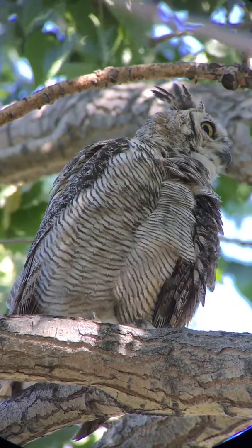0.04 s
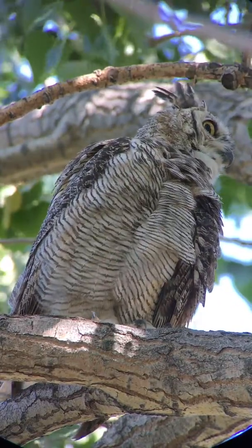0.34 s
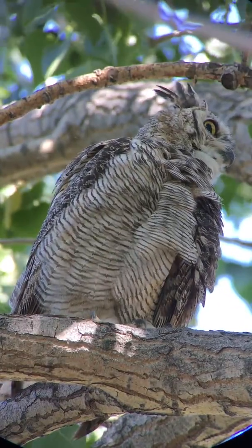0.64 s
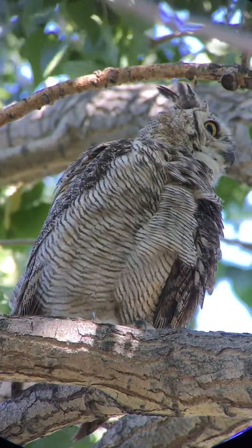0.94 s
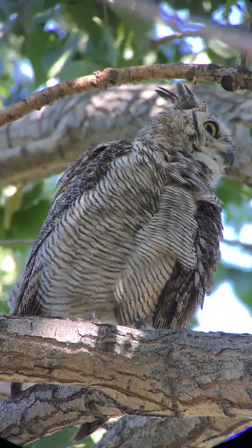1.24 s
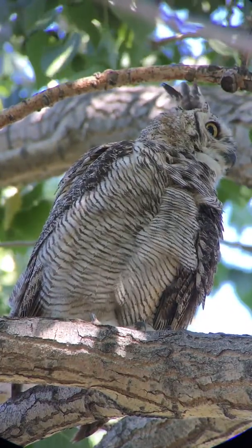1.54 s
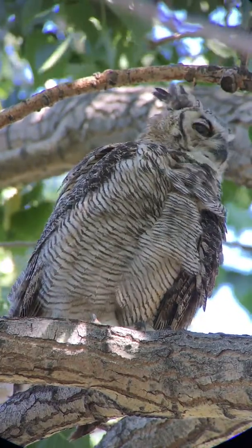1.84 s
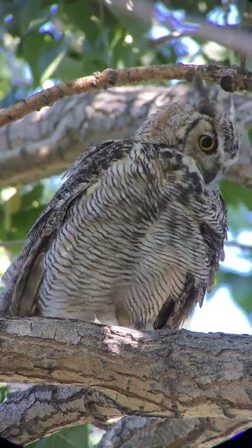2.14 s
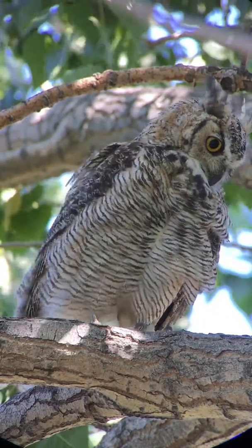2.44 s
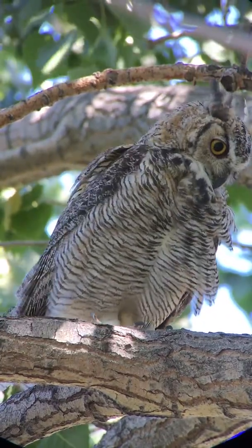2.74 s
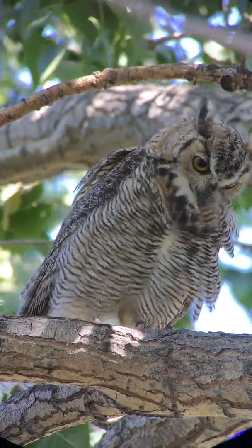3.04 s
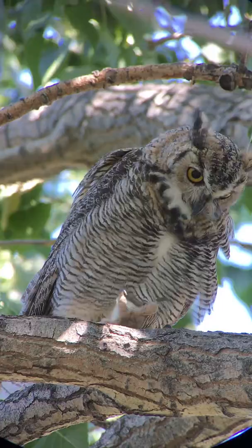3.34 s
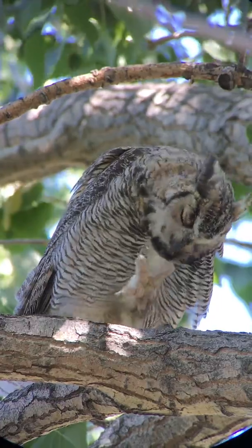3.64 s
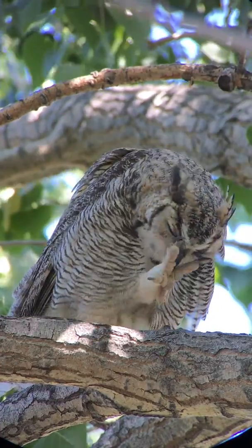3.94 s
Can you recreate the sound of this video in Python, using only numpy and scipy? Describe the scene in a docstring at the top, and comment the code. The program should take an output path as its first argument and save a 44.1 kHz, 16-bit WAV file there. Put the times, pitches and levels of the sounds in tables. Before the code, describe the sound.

Two thin whistled owl calls break into rasps above a faint distant town rumble.

```python
"""Over a town's wash and a distant engine's drone, a bird in leafy trees is already whistling; the thin
note breaks at once into a pitch trill so fast that it rasps, and the trees scatter it. Tiny dry ticks
and faint far chirps come from the branches, and from 1.2 s soft low bumps reach the microphone.
After a soft rustle the bird calls again at 2.6 s: the whistle slides up, holds and breaks into the rasp.
More bumps and a last rustle close the scene."""
import sys
import numpy as np
from scipy import signal
from scipy.fft import rfft, irfft
from scipy.io import wavfile
from scipy.ndimage import uniform_filter1d

SR = 44100
rng = np.random.default_rng(int(sys.argv[2]) if len(sys.argv) > 2 else 0)


def generate_wav(signal):
    """Clip the signal to [-1, 1] and save it as 16-bit WAV at the path in sys.argv[1]."""
    frames = np.transpose(np.atleast_2d(signal))
    scaled = np.clip(frames, -1, 1) * 32767
    pcm = np.round(scaled).astype(np.int16)
    wavfile.write(sys.argv[1], SR, pcm)


N = 176400

# tone colour of the wash (frequency [Hz], relative spectral level [dB])
WASH_SPECTRUM = [(15, -47), (25, -5), (53, -7), (71, -7), (86, -2.5), (96, -4.5), (110, -14.5), (125, -12),
                 (143, -18), (173, -14.5), (198, -19.5), (239, -21), (273, -23.5), (313, -25.5), (507, -30),
                 (700, -26.5), (780, -26), (1110, -27.5), (1610, -30.5), (1890, -34.5), (3710, -38.5),
                 (4980, -45), (6880, -46), (10300, -52.5), (15400, -50)]
# fader rides for the wash's low, middle and high bands (time [s], gain [dB])
RUMBLE_RIDE = [(0, -9.5), (1.0, -3), (1.7, -5), (2.5, -5), (3.3, 3), (3.65, -15), (4, -3)]
MIDDLE_RIDE = [(0, -0.2), (.7, 0), (1.3, 0), (1.8, 0.9), (2.6, -0.5), (3.3, -0.26), (4, 0)]
HISS_RIDE = [(0, 1), (2.3, -1.5), (2.7, 3.5), (3.2, 2), (3.6, 2.5), (4, 3)]
# the engine's firing note, before its trim (time [s], level [dB])
ENGINE_RIDE = [(0.0, -59), (0.87, -49.5), (1.93, -50), (1.99, -62.5), (2.9, -61), (3.14, -54), (3.69, -72),
               (3.74, -56.5), (4.0, -49.5)]
# hums beside the firing note (pitch [Hz], level [dB])
ENGINE_HUMS = [(114, -63.5), (131, -66.5), (231, -74)]
# bird calls (time of the break into the rasp [s], whistle gain [dB], rasp gain [dB], rasp length [s])
CALLS = [(0.026, -54, -54.5, 0.29), (2.73, -57, -53.5, .263)]
# reflections off nearby boughs and one far trunk (delay [s], gain [dB])
TREE_ECHOES = [(.004985, -7), (.01173, -14), (.078, -17)]
# dry ticks and low bumps (time [s], peak gain [dB], pitch [Hz], half width [s])
DRY_TICKS = [(.5385, -54, 14100, 0.00008), (.5473, -31, 15400, .00017), (.5473, -44, 12100, 0.00011),
             (.5473, -51, 7300, 0.000088), (.5583, -45, 13500, .00009), (.5594, -43, 13000, 0.00008),
             (.7306, -60, 12000, .0001), (.7829, -56, 9700, 0.00027), (.7829, -54, 3250, .0003),
             (.8255, -52.5, 2780, 0.00066), (1.1353, -47, 12800, 0.000055)]
LOW_BUMPS = [(1.245, -45.5, 65, 0.029), (1.745, -50, 54, 0.023), (2.02, -49, 40.7, 0.026),
             (3.122, -35.5, 63.4, 0.0093), (3.126, -44.5, 134, 0.0073), (3.28, -48, 53.5, 0.019),
             (3.82, -44.5, 55, 0.016)]
# far chirps and soft rustles (time [s], level [dB], centre [Hz], bandwidth [Hz], half width [s])
FAR_CHIRPS = [(.845, -69.5, 3630, 700, .03), (1.004, -73, 3740, 800, 0.049), (1.37, -63, 1240, 596, 0.039),
              (2.69, -79, 7860, 160, 0.019), (2.88, -73.5, 8650, 350, 0.015)]
SOFT_RUSTLES = [(2.555, -71, 3060, 900, 0.02), (3.87, -70, 3570, 3000, 0.035)]

WASH_DB, WASH_FLICKER_DB = -52, 0.81
SIZZLE_HZ, SIZZLE_WIDTH_HZ, SIZZLE_DB = 13900, 1700, -99.5
FIRING_HZ, ENGINE_TRIM_DB, OCTAVE_DB = 85.13, 0.8, -28.5

WHISTLE_HZ, SCOOP_HZ, SCOOP_S, LEAD_S = 3404, 473, .017, .128  # it starts LEAD_S before the break
WHISTLE_RISE_DB, WHISTLE_TAIL_DB, WHISTLE_FADE_S = 10, -10, .08
WAVER, ONSET_WAVER, FLUTTER, ONSET_FLUTTER, SETTLE_S = .002, .01, .1, .55, .04  # shakiest at the onset

TRILL_HZ, TRILL_JITTER, BEAT_DEPTH = 117, .06, .45
RASP_LOW_HZ, TOP_START_HZ, TOP_HZ, WIDEN_S = 3450, 3700, 4360, .078  # edges of the pitch swing
LOW_SAG_HZ, TOP_SAG_HZ, SAG_DB, SAG_S = 290, 170, 4, .04  # pitch and level drop as the effort ends
CREST_DB, THIRD_DB = -3, -22  # atop each swing the note weakens and gains a third harmonic
SLOP_HZ, RAGGED_HZ, RAGGED_DB = 25, 60, 3
RASP_ATTACK_S, SWELL_DB, SWELL_S, RASP_RELEASE_S = .014, 3, .03, .034

TREES_DB, TREES_T60_S = -11.5, .7
LOW_CUT_HZ, HIGH_CUT_HZ = 34, 15850


def undb(db):
    """Decibels to gain."""
    return 10 ** (np.asarray(db) / 20)


def curve(rows, t):
    """Join table rows by straight lines."""
    return np.interp(t, *np.array(rows).T)


def drift(rate_hz):
    """Smooth random drift, spread near 1."""
    hold = max(int(SR / rate_hz), 1)
    steps = np.repeat(rng.standard_normal(N // hold + 1), hold)
    return 1.3 * uniform_filter1d(uniform_filter1d(steps, hold), hold)[:N]


def noise(spectrum):
    """Noise of rms 1, coloured by a gain at each frequency."""
    coloured = irfft(rfft(rng.standard_normal(N)) * spectrum, N)
    return coloured / np.sqrt(np.mean(coloured ** 2) + 1e-24)


def noise_band(f, centre_hz, width_hz):
    """Noise of rms 1 in one bell-shaped band."""
    return noise(np.exp(-2 * ((f - centre_hz) / width_hz) ** 2))


def tone(hz):
    """Sine of rms 1 on a moving pitch."""
    return np.sqrt(2) * np.sin(2 * np.pi * np.cumsum(hz) / SR)


def town_wash(t, f):
    """A bed of far traffic and leaves: rumble, middle and hiss move apart, with a thin sizzle on top."""
    points_hz, points_db = np.array(WASH_SPECTRUM).T
    colour = undb(np.interp(np.log(f + 1), np.log(points_hz), points_db))
    air = rfft(noise(colour))
    low = 1 / (1 + (f / 70) ** 4)
    high = 1 - 1 / (1 + (f / 6000) ** 4)
    hiss_db = curve(HISS_RIDE, t)
    bands = [(low, curve(RUMBLE_RIDE, t) + 2 * drift(7.44)),
             (1 - low - high, curve(MIDDLE_RIDE, t) + WASH_FLICKER_DB * drift(14)),
             (high, hiss_db)]
    sizzle = undb(SIZZLE_DB + hiss_db) * noise_band(f, SIZZLE_HZ, SIZZLE_WIDTH_HZ)
    return sizzle + undb(WASH_DB) * sum(irfft(air * band, N) * undb(db) for band, db in bands)


def engine(t):
    """A distant engine drones on its firing note and octave, beside faint wavering hums."""
    hz = FIRING_HZ * (1 + .0053 * drift(3.98))
    level = undb(curve(ENGINE_RIDE, t) + ENGINE_TRIM_DB + drift(12.48))
    firing = tone(hz) + undb(OCTAVE_DB) * tone(2 * hz)
    hums = sum(undb(db + 2 * drift(6)) * tone(hum_hz * (1 + .0118 * drift(8)))
               for hum_hz, db in ENGINE_HUMS)
    return level * firing + hums


def whistle(since_break):
    """A thin note scoops up, steadies and swells, then dies away under the rasp."""
    age = np.maximum(since_break + LEAD_S, 0)
    unsteady = np.exp(-age / SETTLE_S)
    scoop = SCOOP_HZ * np.exp(-(age / SCOOP_S) ** 2 / 2)
    waver = 1 + (WAVER + ONSET_WAVER * unsteady) * drift(400)
    rise = undb(WHISTLE_RISE_DB * np.minimum(since_break, 0) / LEAD_S) * np.clip(age / .006, 0, 1)
    tail = undb(WHISTLE_TAIL_DB) * np.exp(-(since_break / WHISTLE_FADE_S) ** 2 / 2)
    envelope = uniform_filter1d(np.where(since_break < 0, rise, tail), size=180)
    flutter = 1 + (FLUTTER + ONSET_FLUTTER * unsteady) * drift(300)
    return envelope * flutter * tone((WHISTLE_HZ - scoop) * waver)


def rasp(since_break, length):
    """The note swings fast up and down in pitch; the swing widens, grows ragged, then sags."""
    age = np.maximum(since_break, 0)
    trill_hz = (since_break > 0) * TRILL_HZ * (1 + TRILL_JITTER * drift(120))
    cycle = 2 * np.pi * np.cumsum(trill_hz) / SR
    swing = (1 - np.cos(cycle)) / 2
    sag = np.exp(np.minimum(age - length, 0) / SAG_S)
    low = RASP_LOW_HZ - LOW_SAG_HZ * sag
    top = TOP_HZ + (TOP_START_HZ - TOP_HZ) * np.exp(-age / WIDEN_S) - TOP_SAG_HZ * sag
    ragged = np.minimum(age / length, 1)
    hz = low + (top - low) * swing + (SLOP_HZ + RAGGED_HZ * ragged) * drift(1400)
    voice = tone(hz) + undb(THIRD_DB) * swing ** 2 * tone(3 * hz)
    attack = np.clip(since_break / RASP_ATTACK_S, 0, 1)
    effort = undb(-SWELL_DB * np.exp(-age / SWELL_S) - SAG_DB * sag)
    release = (1 - np.tanh((age - length) / RASP_RELEASE_S)) / 2
    beat = (1 - BEAT_DEPTH * np.sin(cycle)) * undb(CREST_DB * swing)
    grit = undb(RAGGED_DB * ragged * drift(750))
    return attack * effort * release * beat * grit * voice


def bird(t):
    """Two calls, each a whistle breaking into a rasp."""
    return sum(undb(whistle_db) * whistle(t - at) + undb(rasp_db) * rasp(t - at, length)
               for at, whistle_db, rasp_db, length in CALLS)


def trees(calls, t):
    """Nearby boughs and a far trunk reflect the calls; trunks and leaves scatter them into a short tail."""
    near = calls + sum(undb(db) * np.interp(t - delay, t, calls, left=0) for delay, db in TREE_ECHOES)
    scatter = rng.standard_normal(N) * undb(-60 * t / TREES_T60_S) * np.clip(t / .0068, 0, 1)
    tail = signal.fftconvolve(near, scatter / np.linalg.norm(scatter))[:N]
    return near + undb(TREES_DB) * tail


def ticks_or_bumps(rows):
    """A few cycles under a bell-shaped envelope: a dry tick when high, a soft bump when low."""
    out = np.zeros(N)
    for (at, db, hz, width), phase in zip(rows, rng.random(len(rows))):
        span = np.arange(max(int((at - 5 * width) * SR), 0), min(int((at + 5 * width) * SR) + 1, N))
        since_peak = span / SR - at
        envelope = undb(db) * np.exp(-.5 * (since_peak / width) ** 2)
        out[span] += envelope * np.cos(2 * np.pi * (hz * since_peak + phase))
    return out


def chirps_or_rustles(rows, t, f):
    """Each is a short swell of noise in one band."""
    return sum(undb(db) * np.exp(-.5 * ((t - at) / half_width) ** 2) * noise_band(f, hz, bandwidth)
               for at, db, hz, bandwidth, half_width in rows)


def scene():
    """The mono mix as heard under the tree."""
    t, f = np.arange(N) / SR, np.arange(N // 2 + 1) * SR / N
    bursts = ticks_or_bumps(DRY_TICKS) + ticks_or_bumps(LOW_BUMPS)
    swells = chirps_or_rustles(FAR_CHIRPS, t, f) + chirps_or_rustles(SOFT_RUSTLES, t, f)
    return (trees(bird(t), t) + bursts + swells + engine(t) + town_wash(t, f))[None]


def record(dry):
    """The recorder cuts the deepest bass and the very top."""
    low_cut = signal.butter(4, LOW_CUT_HZ, "high", fs=SR, output="sos")
    high_cut = signal.ellip(8, .1, 50, HIGH_CUT_HZ, fs=SR, output="sos")
    return signal.sosfiltfilt(high_cut, signal.sosfilt(low_cut, dry))


dry = scene()
out = record(dry)
generate_wav(out)
```